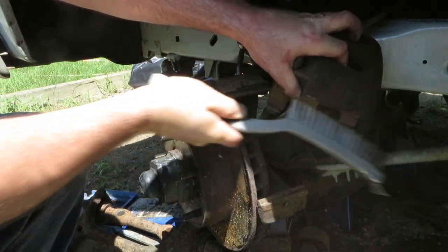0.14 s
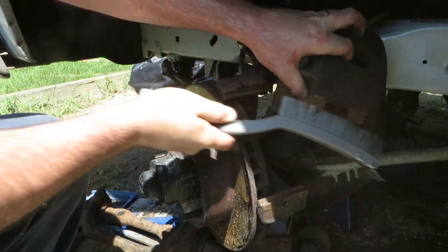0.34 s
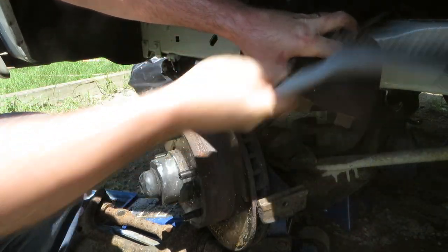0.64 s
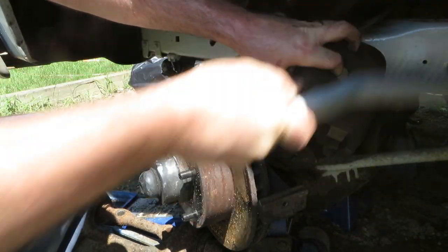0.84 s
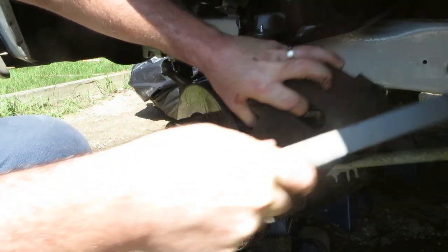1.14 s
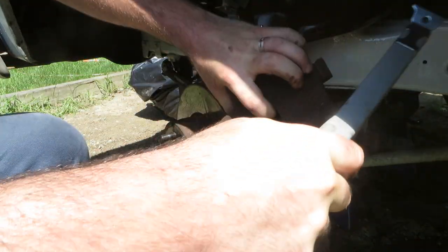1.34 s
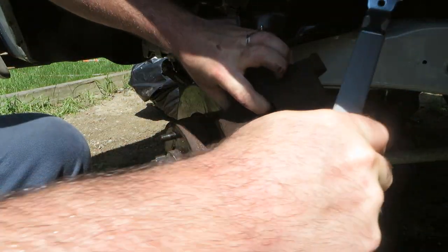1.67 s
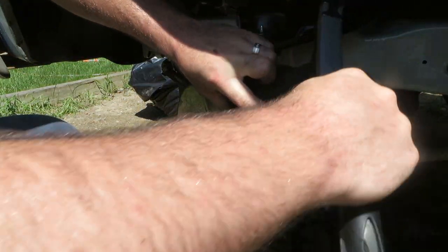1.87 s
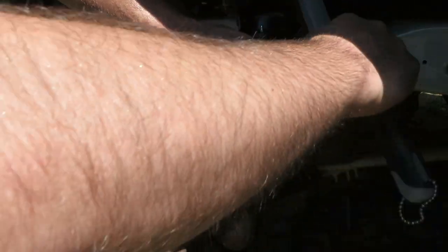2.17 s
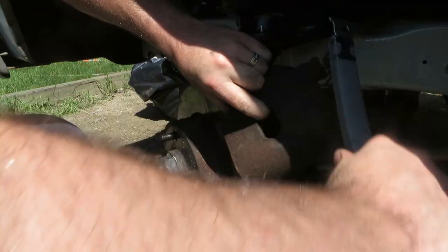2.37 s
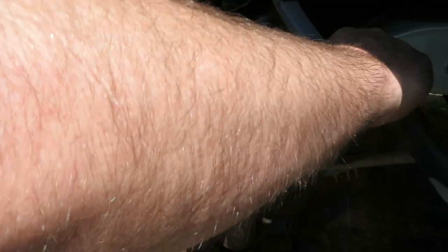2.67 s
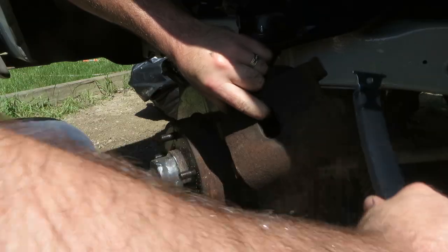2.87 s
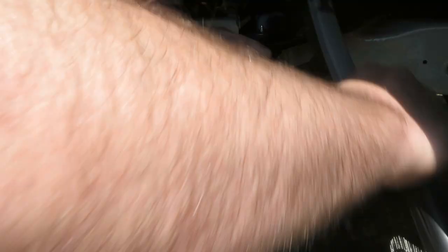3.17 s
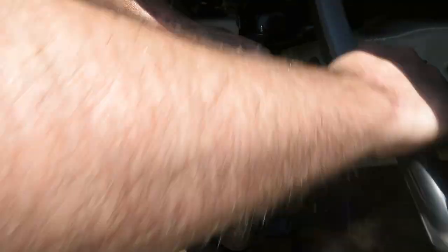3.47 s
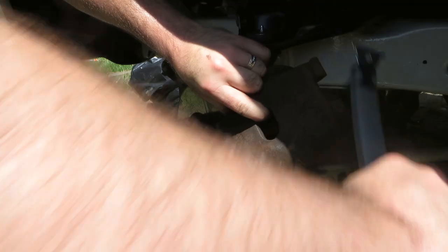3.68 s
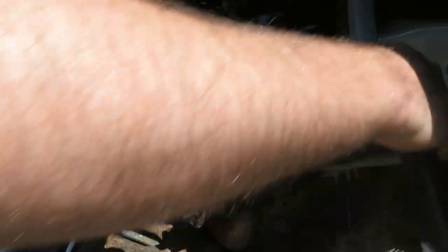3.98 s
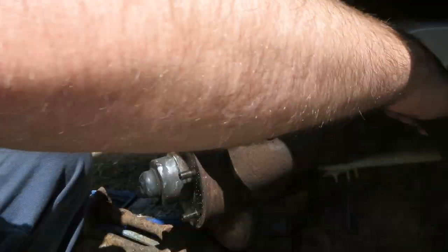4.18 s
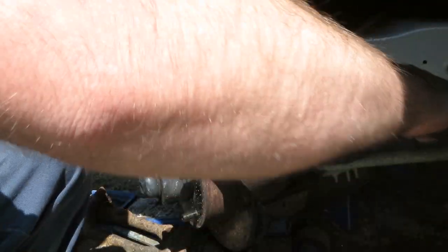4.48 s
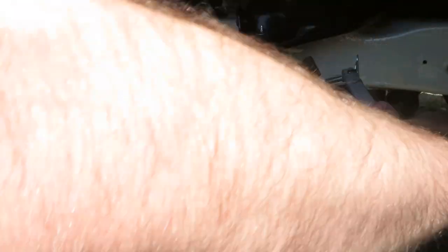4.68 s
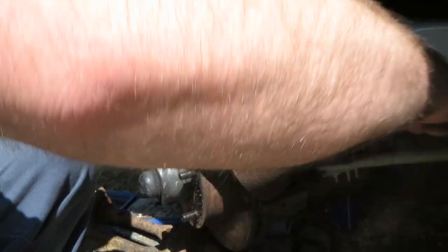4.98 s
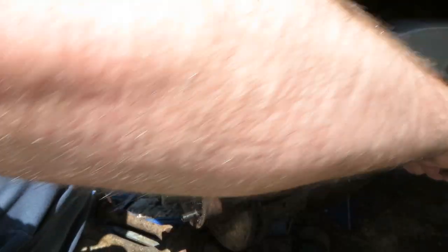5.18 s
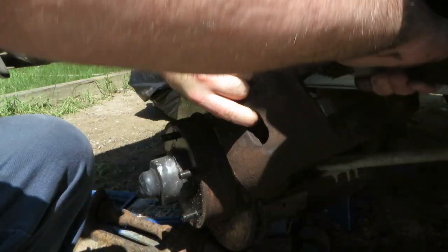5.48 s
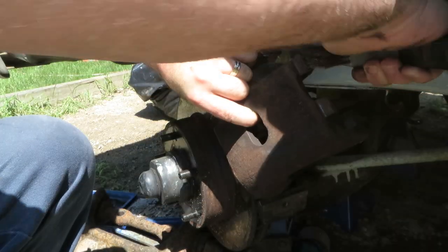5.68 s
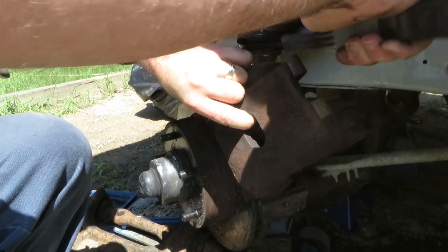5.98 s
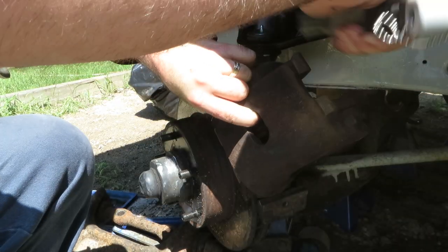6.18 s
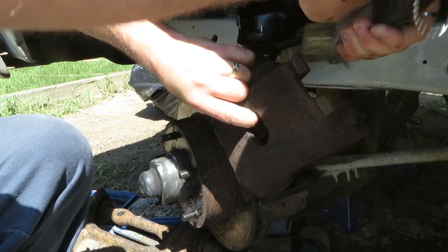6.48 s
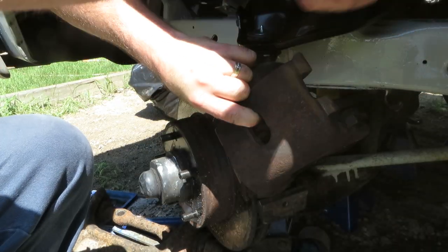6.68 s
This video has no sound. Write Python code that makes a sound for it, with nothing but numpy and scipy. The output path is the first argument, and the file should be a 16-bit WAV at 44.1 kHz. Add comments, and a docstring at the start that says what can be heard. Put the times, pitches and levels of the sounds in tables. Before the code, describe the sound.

Steel bristles scratch rusty brake metal: short tinny scrubs first, then a brief lull with clinks, a little squeak, thumps and arm rustle. Vigorous rasping back-and-forth sweeps come next, dry and toothy with little ringing, then weaker strokes among sharp metal knocks and tiny wire ticks. The microphone is close, with short reflections from the wheel arch and a barely audible outdoor background.

```python
"""Quick scratches of a hand wire brush and slaps on rusty steel: the brush scrubs a car's brake shield outdoors.
Many small stick-slip events of the wires, random clicks, hiss through the tufts and excite the hand-held sheet.
The sheet is noise through resonances, freely ringing or damped; the scraper's clinks are sums of decaying modes.
Knocks are a contact pulse with modes and clatter; squeaks are jittered tones and bumps are decaying sines.
The arm's rumble and rustle are shaped noise, over a faint outdoor hiss."""
import sys
import numpy as np
from scipy import signal
from scipy.fft import rfft, irfft
from scipy.io import wavfile

SR = 44100
rng = np.random.default_rng(int(sys.argv[2]) if len(sys.argv) > 2 else 0)


def generate_wav(signal):
    """Clip the signal to [-1, 1] and save it as 16-bit WAV at the path in sys.argv[1]."""
    frames = np.transpose(np.atleast_2d(signal))
    scaled = np.clip(frames, -1, 1) * 32767
    pcm = np.round(scaled).astype(np.int16)
    wavfile.write(sys.argv[1], SR, pcm)


N = 301203
TIME = np.arange(N) / SR  # [s]
GRID_HZ = np.maximum(np.fft.rfftfreq(8192, 1 / SR), 1)  # frequencies at which filters are designed

# Levels are relative drives of a source unless stated; colours are spectral shapes.

# Strokes of the brush; as it rolls from nose to heel, bite and sheet drive fall by the roll (rise if negative):
# (time of full speed [s], run-up [s], run-out [s], wire scratch [dB], sheet drive [dB], roll [dB per stroke])
STROKES = [(0.099, 0.09, 0.066, -19.5, -31.5, 2), (0.273, 0.098, 0.065, -18.5, -22, -30),
           (0.38, 0.073, 0.28, -40.5, -65, -1), (0.469, 0.099, 0.12, -28, -44, 24),
           (0.6, 0.074, 0.079, -22, -39, -11), (0.724, 0.085, 0.046, -27.5, -42, -3),
           (1.13, 0.26, 0.36, -62.5, -56, -4), (1.41, 0.087, 0.08, -44, -34.5, 7),
           (1.742, 0.074, 0.031, -38.5, -49, -11), (1.829, 0.051, 0.023, -41, -42.5, -5),
           (2.448, 0.14, 0.25, -15, -31.5, 20), (2.69, 0.18, 0.17, -18.5, -36.5, -1),
           (2.898, 0.11, 0.17, -15, -28.5, 13), (3.049, 0.057, 0.038, -25.5, -53.5, -2),
           (3.2, 0.074, 0.06, -29.5, -39.5, -26), (3.31, 0.11, 0.18, -16, -30.5, 23),
           (3.449, 0.14, 0.046, -32, -54, 14), (3.786, 0.14, 0.18, -17.5, -33.5, 14),
           (3.92, 0.014, 0.061, -30, -48, 18), (3.971, 0.033, 0.029, -29, -45.5, -10),
           (4.175, 0.022, 0.031, -37, -63, 3), (4.36, 0.1, 0.083, -39, -53.5, 24),
           (4.71, 0.2, 0.12, -19.5, -35, 2), (4.961, 0.21, 0.37, -24.5, -39.5, -8),
           (5.222, 0.12, 0.088, -33.5, -54, -7), (5.486, 0.2, 0.14, -29, -49, -8),
           (5.62, 0.24, 0.12, -40.5, -54, 31), (5.81, 0.14, 0.21, -33.5, -58, 2),
           (6.111, 0.15, 0.058, -33.5, -52.5, 6), (6.535, 0.2, 0.12, -28.5, -51, 4),
           (6.706, 0.083, 0.063, -26.5, -41.5, -3)]
# Tufts slap or catch on the sheet: (time [s], scratch level [dB], sheet level [dB], decay time [s])
SLAPS = [(0.082, -26, -20, 0.0084), (0.26, -25, -15, 0.0043), (0.279, -28, -15, 0.0032),
         (0.287, -30, -29, 0.0056), (0.436, -22, -12, 0.0096), (0.695, -15, -35, 0.017),
         (0.722, -1, -6, 0.0017), (0.729, -20, -19.5, 0.011), (0.737, -5, -8.5, 0.0018),
         (1.264, -35, -22, 0.015), (1.43, -31, -25, 0.02), (1.452, -23.5, -22, 0.0063),
         (2.007, -34.5, -33.5, 0.0055), (2.083, -32.5, -41, 0.006), (2.321, -15.5, -22.5, 0.0063),
         (2.954, -9.5, -22.5, 0.0069), (3.169, -33.5, -22, 0.0039), (3.677, -8, -12.5, 0.0042),
         (3.709, -20, -27.5, 0.027), (3.809, -13, -29, 0.011), (4.22, -34, -33, 0.006),
         (4.52, -21.5, -24.5, 0.011), (4.817, -19.5, -28, 0.0034), (4.927, -15.5, -38, 0.0085),
         (5.472, -19, -35.5, 0.029), (5.854, -1.5, -1, 0.001), (6.403, -12, -28, 0.0051),
         (6.424, -15.5, -35, 0.011), (6.659, -16, -40, 0.0067), (6.695, -22, -42, 0.0068),
         (6.702, -12.5, -37, 0.016)]
# Resonances of the loose sheet: (frequency [Hz], width [Hz], level [dB])
LOOSE_RESONANCES = [(1010, 120, 1), (1233, 55, 15), (1347, 39, 18.5), (1510, 530, 13), (1812, 37, 21),
                    (2030, 280, 10), (2955, 29, 16.5), (3926, 30, 14.5), (3700, 47, 12.5), (4550, 60, 19.5),
                    (5070, 55, 19), (5860, 130, 19.5), (8100, 250, 23.5)]
# Broad colour of the loose sheet: (frequency [Hz], density [dB per Hz])
LOOSE_COLOUR = [(500, -23), (800, -8.5), (1200, -4.5), (2200, -10.5), (3200, 3.5), (5000, -7), (8000, -21),
                (16000, -37)]
# The few damped resonances that the pressed sheet keeps: (frequency [Hz], width [Hz], level [dB])
PRESSED_RESONANCES = [(1230, 29, -2), (2110, 220, 1.5), (4800, 90, 4)]
# Broad colour of the pressed sheet: (frequency [Hz], density [dB per Hz])
PRESSED_COLOUR = [(500, -7), (950, -13), (1250, -7), (2100, 5.5), (3100, 4), (4500, -8), (9000, -39.5)]
# Broad colour of the wire tips: (frequency [Hz], density [dB per Hz])
WIRE_COLOUR = [(600, -51), (2200, -5.5), (3000, -0.5), (4400, 0.5), (7000, 2.5), (11000, 2), (14000, -12.5),
               (16000, -28.5)]
# The sheet rings while its loose edge is brushed, and is dead when held still or pressed home:
# (time [s], share of free ringing [0-1])
FREEDOM = [(.12, 0.9), (.27, 0.8), (.8, 1), (.87, 0.7), (1.22, 0.2), (1.26, 0.97), (1.5, 0.82), (1.6, 0.27)]
# The slant of the wires sets their colour, and the arm shades the top:
# (time [s], treble above 7.2 kHz [dB], bite below 4.1 kHz [dB])
SLANT = [(.1, -0.5, 0), (.6, -2, 3.5), (1.25, -4.5, -7), (2.05, -3.5, -6.5), (2.95, -0.1, -4),
         (3.8, 1.5, -2), (4.75, 0.5, 2), (5.5, -3, 1.5), (5.9, -9, -2.5), (6.75, -7, .5)]
# Between strokes the tufts drag lightly and the arms stir: (time [s], drag level [dB], rumble level [dB])
STIRRING = [(0, -34.5, -44), (.66, -40.5, -54), (.9, -71, -52), (1.65, -56, -45.5), (1.95, -50, -41),
            (2.2, -45, -46.5), (3.1, -55, -46.5), (3.62, -55.5, -49), (4.4, -50, -47.5),
            (4.75, -44.5, -42.5), (5.3, -53, -50.5), (6.27, -69, -59), (6.82, -56.5, -50.5)]
# Wires catch on an edge and flick free: (time [s], level [dB], centre frequency [Hz], decay time [s])
FLICKS = [(1.042, -36, 7360, 0.002), (3.623, -35, 9500, 0.0035), (4.174, -21.5, 8700, 0.0041),
          (4.274, -34, 7350, 0.0032), (4.305, -20.5, 7160, 0.0022), (4.314, -20, 7150, 0.0026),
          (5.351, -27, 8850, 0.0015), (6.245, -42, 8440, 0.0027), (6.397, -14.5, 3130, 0.0014),
          (6.405, -20.5, 3400, 0.004), (6.425, -11, 3350, 0.002), (6.654, -10.5, 3130, 0.0017)]
# Knocks: (time [s], crack level [dB], contact pitch [Hz], ring and clatter level [dB], tuning of modes [ratio])
KNOCKS = [(1.266, -1, 3240, -12, 1.07), (1.430, -10, 3020, -23.5, 1), (1.457, -9, 1520, -24, .95),
          (4.990, -23, 463, -16, 0.85), (5.1118, 7.5, 1900, -10.5, 0.88), (5.117, -1.5, 973, -27.5, .91),
          (5.5637, 5.5, 1850, -11.5, 1), (5.611, -6, 1480, -16.5, 1.03), (5.677, -22.5, 930, -25.5, 1.02),
          (5.854, -4.5, 2480, -15.5, .92)]
# Modes of the knocked parts: (frequency [Hz], level [dB], t60 [s])
BODY_MODES = [(243, -24, 0.2), (532.6, -5.5, 0.099), (639, -10.5, 0.18), (696, -14.5, 0.19),
              (790, -15, 0.077), (954, -5, 0.07), (1646, -11.5, 0.089), (1859, -13.5, 0.085),
              (2270, -11, 0.051)]
# Dense clatter of the knocked parts, shorter above 1 kHz: (band centre [Hz], level [dB], t60 [s])
CLATTER = [(312, -15, 0.17), (575, -10.5, 0.27), (1220, -1, 0.03), (2400, 1, 0.026), (4800, -9, 0.047)]
# The scraper blade is struck: (time [s], level [dB], corner frequency of the contact [Hz])
CLINKS = [(1.252, -29, 9000), (1.35, -28.5, 9100), (1.455, -18.5, 1910)]
# Modes of the blade and the steel it touches: (frequency [Hz], level [dB], t60 [s])
BLADE_MODES = [(290.5, -24, 2.9), (1223, -6, 0.13), (1230, -16.5, 0.69), (2513, -6.5, 0.18),
               (3914, -22, 0.45), (4829, -15, 0.13), (5240, -4.5, 0.16), (5572, -20, 0.54),
               (5700, -14, 0.13), (6400, -8, 0.17), (9370, -15, 0.21), (10810, -17, 0.3)]
# The blade or a tuft sticks and slips on one note:
# (time of the height [s], half length [s], level [dB], pitch [Hz], spread of the pitch [share])
SQUEAKS = [(1.478, .034, -24.5, 1241, .002), (1.653, .06, -53, 2580, 0.0043),
           (3.438, 0.038, -30, 4420, 0.057), (6.555, 0.062, -35, 5400, 0.046),
           (6.728, 0.012, -21.5, 5150, .05)]
# The hand and the handle bump softly: (time [s], level [dB], pitch [Hz])
THUMPS = [(0.235, -27.5, 235), (1.266, -15.5, 159), (1.301, -15.5, 99), (1.353, -18.5, 280),
          (1.432, -19, 138), (1.489, -22, 246), (1.517, -23, 92), (1.885, -19.5, 185), (1.918, -19, 104),
          (5.042, -15.5, 143), (5.114, -15.5, 199), (5.484, -35, 294), (5.855, -25, 300)]
# Arms and clothes shift: (time of the height [s], rise [s], fall [s], rumble level [dB], rustle level [dB])
SHIFTS = [(0.1, 0.034, 0.079, -45.5, -36.5), (0.26, 0.083, 0.027, -53, -41),
          (0.759, 0.089, 0.097, -50, -42), (1.13, 0.067, 0.053, -59, -40.5),
          (1.227, 0.03, 0.021, -47, -34.5), (1.38, 0.22, 0.2, -36, -32.5), (1.75, 0.033, 0.039, -46, -38.5),
          (5.53, 0.052, 0.056, -42, -45.5), (6.07, 0.087, 0.048, -68, -48)]
# Broad colour of the arm's rumble: (frequency [Hz], density [dB per Hz])
RUMBLE_COLOUR = [(20, -35.5), (40, -5.5), (65, 4.5), (110, 2.5), (170, -2), (250, -24.5), (2000, -74.5)]
# Broad colour of the clothes' rustle: (frequency [Hz], density [dB per Hz])
RUSTLE_COLOUR = [(80, -20.5), (200, 6), (300, 5.5), (650, -1), (1000, -2.5), (2500, -33), (10000, -69)]
# Weight of the side signal between two microphone ports: (frequency [Hz], gain [dB])
SIDE_GAIN = [(60, -33), (150, -19), (400, -16), (1200, -18.5), (4400, -33), (8100, -10), (15000, -2)]
# Imbalance of the two ports: (frequency [Hz], left over right [dB])
LEAN = [(150, 1.1), (600, 0.5), (4400, -0.5), (8100, 1), (15000, 3.5)]

SCRATCH_POWER, DRIVE_POWER = 3.03, 2.7  # scratch and drive grow as these powers of the hand's speed
DRAG_DRIVE_DB, DRAG_DRIVE_TOP_DB = -2, -54  # dragging drives the sheet too, up to a limit
TUFT_TWANG_DB, SHEET_TICK_DB = -9.5, -7  # single wires in the hiss and on the loose sheet
ARM_RUMBLE_DB, SLEEVE_DB = -28, -6  # rumble of the arm against its scratch; rustle against rumble
CUTOFF_HZ = 15800


def brush():
    """Stick-slip friction: wire slips hiss and shake the sheet, unlike in mid and side as they spread in space."""
    judder = from_db(1.1 * flutter(rate=260))  # whole tufts stick and slip together
    # strokes and slaps add in power
    tip_force, bite_force, sheet_force = np.hypot(scrubbing() * judder, slaps()[[0, 0, 1]])
    free = np.clip(in_time(FREEDOM)[0], 0, 1)
    colour_flutter_db = 1.4 * np.array([flutter(rate=80), flutter(rate=80)])
    treble, bite = from_db(in_time(SLANT) + colour_flutter_db)
    bite = bite * bite_force / tip_force

    wire_band, sheet_band = (4000, 12000), (900, 2500)  # [Hz]
    crowd = ripple(depth_db=1.3, spacing_hz=30)
    wires = unit_in(response(WIRE_COLOUR) * crowd, wire_band)
    loose = unit_in(response(LOOSE_COLOUR, LOOSE_RESONANCES), sheet_band)
    pressed = unit_in(response(PRESSED_COLOUR, PRESSED_RESONANCES) * crowd, sheet_band)

    pair = []
    for _ in range(2):
        grit = from_db(-15) * snaps(per_s=450, spread_db=5.0)  # flakes of rust break off
        twang = from_db(TUFT_TWANG_DB) * twangs(per_s=1100, hz=5600, octaves=2.0, decay=.006)
        slips = from_db(-1.2) * snaps(per_s=24000, spread_db=4.5)
        hiss = filtered(tip_force * (slips + grit + twang), wires)
        low, dull = below(hiss, hz=4100), below(hiss, hz=7200)
        scratch = low * bite + (dull - low) + (hiss - dull) * treble

        ticks = from_db(SHEET_TICK_DB) * twangs(per_s=400, hz=2800, octaves=2.4, decay=.002)
        loose_hits = snaps(per_s=1200, spread_db=3.5) + ticks
        ring = filtered(np.sqrt(free) * sheet_force * loose_hits, loose)
        pressed_hits = snaps(per_s=12000, spread_db=2.0) + grit
        rasp = filtered(np.sqrt(1 - free) * sheet_force * pressed_hits, pressed)
        # the wire tips make the loose edge sing
        sing = from_db(-16.0) * free * tip_force * band_noise(3080, 1.2, N)
        pair.append(scratch + ring + rasp + sing)
    return np.array(pair)


def scrubbing():
    """Friction forces of strokes and drag, summed in power: on the wire tips, on their bite, on the sheet."""
    drag_db = in_time(STIRRING)[0]
    drag_drive_db = np.minimum(drag_db + DRAG_DRIVE_DB, DRAG_DRIVE_TOP_DB)
    power = from_db([drag_db, drag_db, drag_drive_db]) ** 2
    for s, rise, fall, scratch_db, sheet_db, roll_db in STROKES:
        speed, travel = swing(rise, fall)
        roll = from_db(-roll_db * travel)
        scratch = from_db(scratch_db) * speed ** SCRATCH_POWER
        drive = from_db(sheet_db) * speed ** DRIVE_POWER * roll
        for track, force in zip(power, (scratch, scratch * roll, drive)):
            add(track, s - rise, force ** 2)
    return np.sqrt(power)


def swing(rise, fall):
    """Cosine motion of a hand: its speed (0-1), and its time past the peak as a share of the move."""
    t = np.arange(-rise, fall, 1 / SR)
    speed = np.abs(np.cos(np.pi / 2 * t / np.where(t < 0, rise, fall)))
    return speed, t / (rise + fall)


def slaps():
    """Impact of a bundle of wires: a brief surge of force on the tips and on the sheet."""
    surge, t = np.zeros((2, N)), TIME[:SR // 8]
    for s, scratch_db, sheet_db, decay in SLAPS:
        # the wires land one after another
        shape = (1 - np.exp(-t / 0.0004)) * np.exp(-t / decay)
        add(surge[0], s, from_db(scratch_db) * shape)
        add(surge[1], s, from_db(sheet_db) * shape)
    return surge


def snaps(per_s, spread_db):
    """Impulsive excitation: sparse random clicks of uneven size and either sign, unit power."""
    sizes = from_db(spread_db * np.minimum(rng.exponential(1, N), 4)) * rng.choice([-1, 1], N)
    return rms_one(sizes * (rng.random(N) < per_s / SR))


def twangs(per_s, hz, octaves, decay):
    """Free vibration of single wires that spring loose, each at a pitch of its own; unit power."""
    out, t = np.zeros(N), TIME[:SR // 40]
    for when, pitch, size in rng.random((int(per_s * N / SR), 3)):
        wire_hz = hz * 2 ** (octaves * (pitch - .5))
        add(out, when * TIME[-1], (.2 + size ** 2) * np.sin(2 * np.pi * wire_hz * t) * np.exp(-t / decay))
    return rms_one(out)


def ripple(depth_db, spacing_hz):
    """Modal overlap: the crowded high modes of wires and steel leave fine peaks and dips in the colour."""
    knots = rng.standard_normal(len(GRID_HZ))
    return from_db(depth_db * np.interp(GRID_HZ / spacing_hz, np.arange(len(knots)), knots))


def flicks():
    """Release of stored bending: a lone wire springs off an edge with a thin tick of decaying band noise."""
    out, t = np.zeros(N), TIME[:SR // 16]
    for s, db, hz, decay in FLICKS:
        add(out, s, from_db(db) * band_noise(hz, 1.2, len(t)) * np.exp(-t / decay))
    return out


def knocks(crack_cycles=1.17):
    """Impact: a short contact crack, then modes and clatter, which a soft contact excites less when high."""
    out, t = np.zeros(N), TIME[:SR // 2]
    for s, db, hz, ring_db, tuning in KNOCKS:
        age = 2 * hz * t / crack_cycles
        crack = age * np.exp(1 - age) * np.sin(2 * np.pi * hz * t)
        ring = np.zeros(len(t))
        for k, (f, level, t60) in enumerate(BODY_MODES):
            gain = contact_gain(f, hz) * from_db(level) * (-1) ** k
            ring += gain * np.sin(2 * np.pi * tuning * f * t) * dying(t, t60)
        for f, level, t60 in CLATTER:
            gain = contact_gain(f, hz) * from_db(level)
            ring += gain * band_noise(f, np.sqrt(2), len(t)) * dying(t, t60)
        build_up = 1 - np.exp(-t / 0.001)
        add(out, s, from_db(db) * crack + from_db(ring_db) * ring * build_up)
    return out


def contact_gain(f, contact_hz):
    """Finite contact time: excitation falls away well above the pitch of the contact."""
    return 1 / np.hypot(1, (f / (1.42 * contact_hz)) ** 2)


def scraper():
    """Modal ringing: the steel blade on the brush's nose rings clearly when it touches the sheet."""
    out, t = np.zeros(N), TIME[:SR * 3 // 4]
    for s, db, hard_hz in CLINKS:
        for f, level, t60 in BLADE_MODES:
            gain = from_db(db + level) / np.hypot(1, f / hard_hz)
            add(out, s, gain * np.sin(2 * np.pi * f * t) * dying(t, t60))
    return out


def squeaks():
    """Periodic stick-slip: a note swells and stops with the rubbing while its pitch jitters."""
    out = np.zeros(N)
    for s, half, db, hz, spread in SQUEAKS:
        force = swing(half, half)[0]
        pitch = hz * (1 + spread * flutter(rate=1500)[:len(force)])
        phase = 2 * np.pi * np.cumsum(pitch) / SR
        add(out, s - half, from_db(db) * force * np.sin(phase))
    return out


def reflections(x, t60):
    """Early reverberation: dense short echoes from the wheel arch and the ground, of unit energy."""
    t = TIME[:SR // 4]
    echoes = rng.standard_normal(len(t)) * dying(t, t60) * (1 - np.exp(-t / 0.00036))
    return signal.fftconvolve(x, echoes / np.linalg.norm(echoes))[:N]


def thumps(t60=0.1, overtone_db=-6):
    """Damped oscillation: a soft bump swings for a few cycles, and its overtone dies sooner."""
    out, t = np.zeros(N), TIME[:SR // 4]
    for s, db, hz in THUMPS:
        swings = np.sin(2 * np.pi * hz * t) * dying(t, t60)
        overtone = np.sin(2 * np.pi * 2.3 * hz * t) * dying(t, t60 / 2)
        onset = 1 - np.exp(-t / 0.0018)
        add(out, s, from_db(db) * (swings + from_db(overtone_db) * overtone) * onset)
    return out


def handling(ceiling_db):
    """Motion noise: arms and clothes rumble and rustle; levels are capped before a lumpy flutter is applied."""
    stirring = from_db(in_time(STIRRING)[1])
    arm = np.hypot(stirring, from_db(ARM_RUMBLE_DB) * scrubbing()[0])
    power = np.array([arm, from_db(SLEEVE_DB) * arm]) ** 2
    for s, rise, fall, *levels_db in SHIFTS:
        for track, db in zip(power, levels_db):
            add(track, s - rise, (from_db(db) * swing(rise, fall)[0]) ** 2)
    capped = np.minimum(np.sqrt(power), from_db(ceiling_db))
    rumble, rustle = capped * from_db(2.0 * flutter(rate=42))
    rumble_band, rustle_band = (50, 250), (250, 800)  # [Hz]
    low = filtered(rumble * rng.standard_normal(N), unit_in(response(RUMBLE_COLOUR), rumble_band))
    grains = snaps(per_s=1500, spread_db=-0.5)
    cloth = filtered(rustle * grains, unit_in(response(RUSTLE_COLOUR), rustle_band))
    return low + cloth


def air():
    """Incoherent background: faint outdoor hiss, independent at the two ports."""
    return from_db(-59.5) * np.array([band_noise(2200, 3.1, N) for _ in range(2)])


def from_db(db):
    """Logarithmic level: decibels to amplitude gain."""
    return 10 ** (np.asarray(db) / 20)


def rms_one(x):
    """Normalisation to unit mean power."""
    return x / np.sqrt(np.mean(x ** 2) + 1e-20)


def in_time(rows):
    """Linear interpolation of each column of a curve at every sample."""
    s, *columns = np.transpose(rows)
    return [np.interp(TIME, s, c) for c in columns]


def flutter(rate):
    """Slow random modulation: straight lines between random values, rate values a second, unit power."""
    knots = rng.standard_normal(N // 20)
    return rms_one(np.interp(TIME * rate, np.arange(len(knots)), knots))


def dying(t, t60):
    """Exponential free decay by 60 dB in t60 seconds."""
    return np.exp(-np.log(1000) * t / t60)


def add(track, s, sound):
    """Superposition: mix a sound into a track at a time in seconds."""
    start = max(round(s * SR), 0)
    track[start:start + len(sound)] += sound[:N - start]


def band_noise(hz, spread, size):
    """Band-limited noise from hz / spread to hz * spread, unit power."""
    spread = max(spread, 1.01)
    edges = [min(hz / spread, .4 * SR), min(hz * spread, .45 * SR)]
    band = signal.butter(2, edges, "band", fs=SR, output="sos")
    return rms_one(signal.sosfilt(band, rng.standard_normal(size)))


def response(points, resonances=()):
    """Frequency response: a broad colour with resonances standing out of it in power."""
    hz, db = np.transpose(points)
    colour = from_db(np.interp(np.log(GRID_HZ), np.log(hz), db))
    peaks = 0
    for f, width, level in resonances:
        peaks = peaks + from_db(level) ** 2 / (1 + (2 * (GRID_HZ - f) / width) ** 2)
    return colour * np.sqrt(1 + peaks)


def unit_in(gain, band):
    """Noise-gain normalisation: white noise of unit power leaves with unit power inside the band."""
    inside = (GRID_HZ > band[0]) * (GRID_HZ < band[1])
    return gain / np.sqrt(np.mean(gain ** 2 * inside))


def filtered(x, gain):
    """Causal minimum-phase filtering, by folding the cepstrum of the gain."""
    cepstrum = irfft(np.log(gain + 1e-9))
    half = len(cepstrum) // 2
    cepstrum[1:half] *= 2
    cepstrum[half + 1:] = 0
    impulse = irfft(np.exp(rfft(cepstrum)))[:half]
    return signal.fftconvolve(x, impulse)[:len(x)]


def below(x, hz):
    """Zero-phase low-pass: the part of a sound under a frequency."""
    return signal.sosfiltfilt(signal.butter(4, min(hz, .4 * SR), fs=SR, output="sos"), x)


def scene():
    """Mid-side stereo: sources close ahead, with scrubbing and faint rustle spread, blows widened by echoes."""
    mid, spread = brush()
    blows = knocks() + scraper() + squeaks()
    echoes = reflections(blows, t60=0.059)
    mid = mid + flicks() + thumps() + blows + from_db(-8.0) * echoes + handling(ceiling_db=0)
    spread = spread + flicks() + from_db(3.5) * echoes + from_db(19.5) * handling(ceiling_db=-52.5)
    side = filtered(spread, response(SIDE_GAIN))  # the ports differ most in the treble
    lean = np.sqrt(response(LEAN))
    left = filtered(mid + side, lean)
    right = filtered(mid - side, 1 / lean)
    return np.array([left, right]) + air()


def record(dry):
    """Saturation and band limit: the loudest peaks are rounded off and the top is cut."""
    rounded = dry / (1 + np.abs(dry / 1.05) ** 6) ** (1 / 6)
    return signal.sosfilt(signal.ellip(10, .1, 80, CUTOFF_HZ, fs=SR, output="sos"), rounded)


dry = scene()
out = record(dry)
generate_wav(out)
```